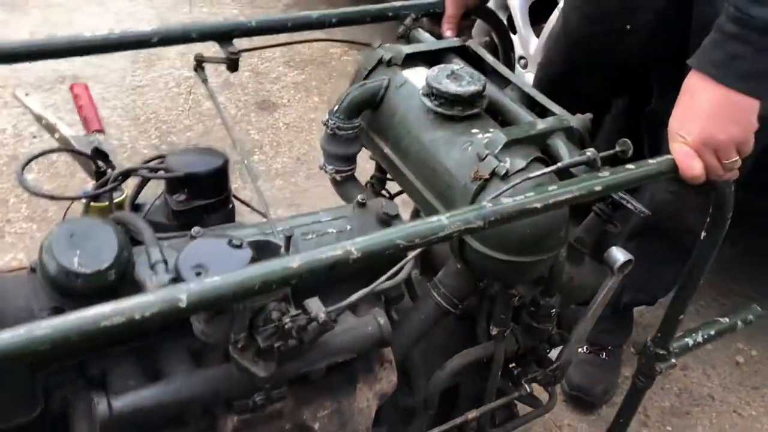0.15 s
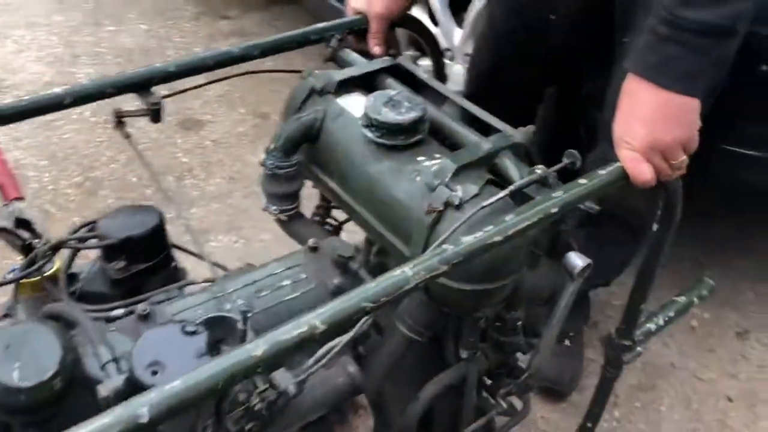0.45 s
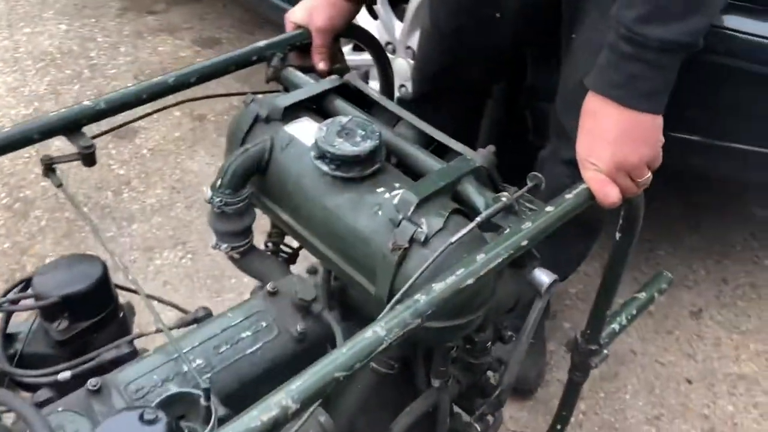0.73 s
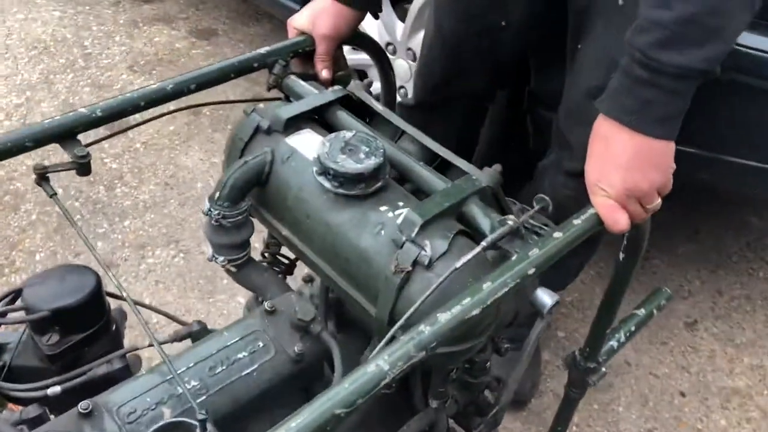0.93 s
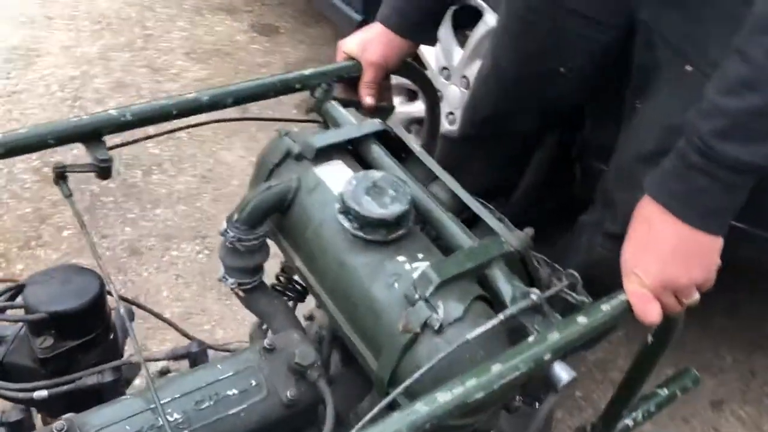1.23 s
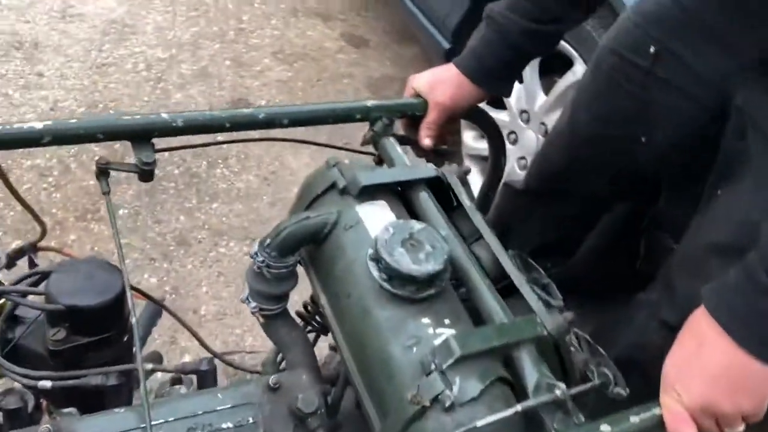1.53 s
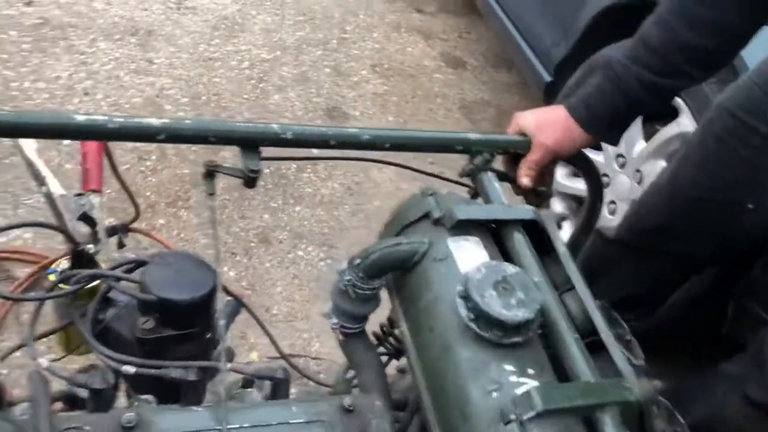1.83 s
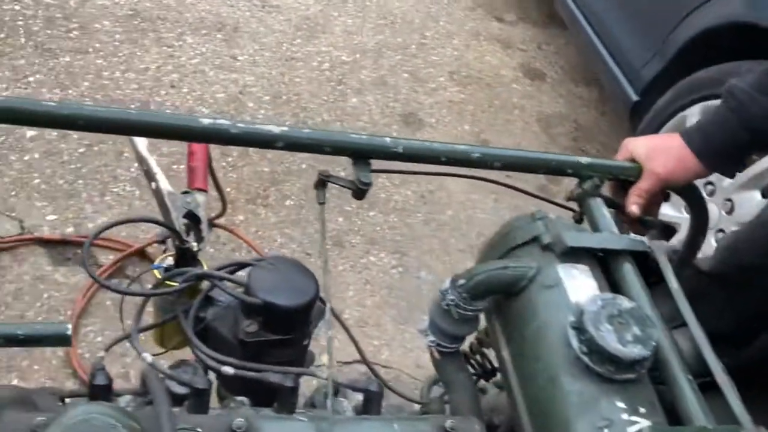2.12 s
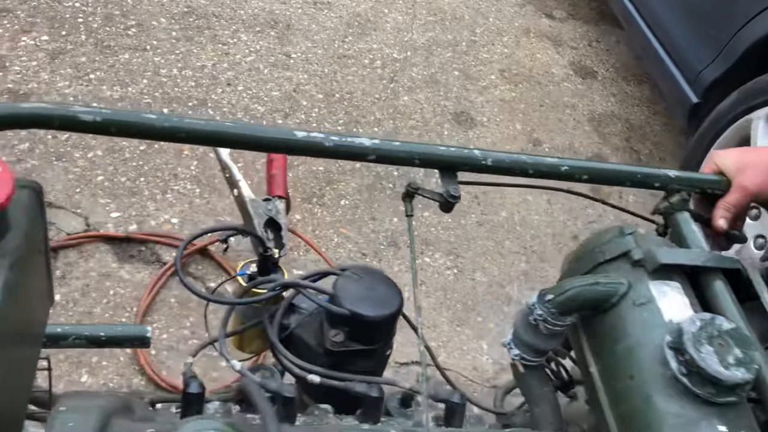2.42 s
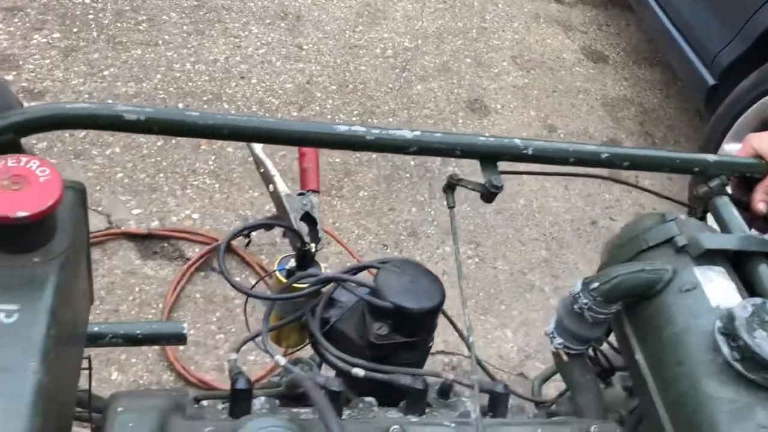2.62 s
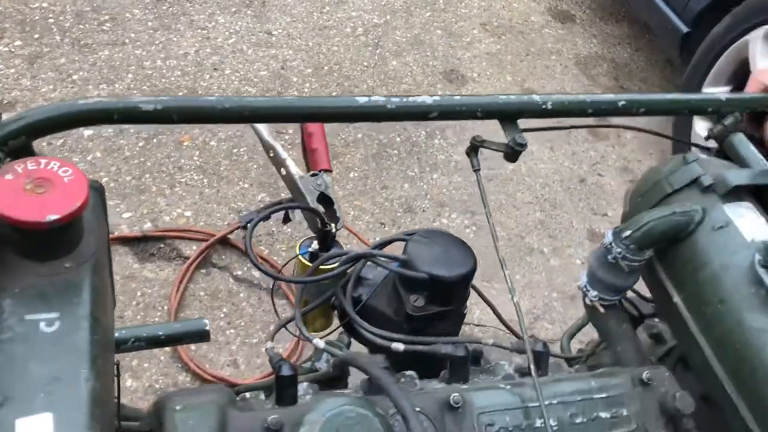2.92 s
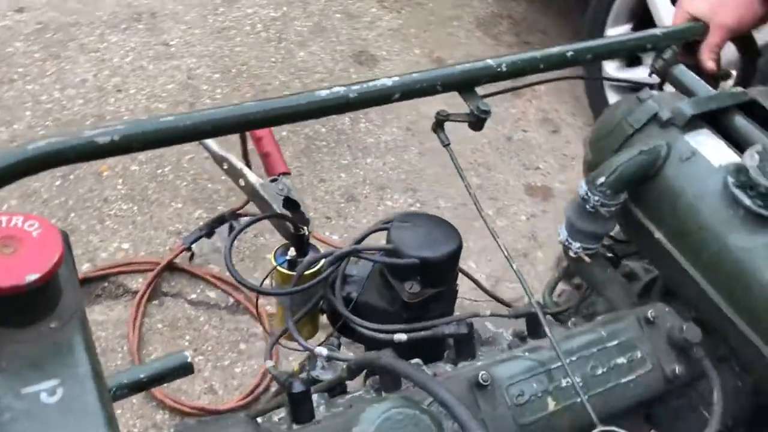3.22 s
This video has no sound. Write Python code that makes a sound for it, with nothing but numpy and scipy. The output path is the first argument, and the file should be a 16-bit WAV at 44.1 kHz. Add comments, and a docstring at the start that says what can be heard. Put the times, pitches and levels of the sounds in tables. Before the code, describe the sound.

Petrol engine drones steadily up close with deep exhaust rumble, rattling metal and airy hiss

```python
"""On a driveway, close to a moving microphone, a four-cylinder petrol engine runs at a fast idle.
Each firing is an impulse: it rings low exhaust resonances, buzzes the frame and sets off noise bursts
that ring as block clatter, valve gear and loose fittings. Filtered noise makes a steady hiss of air.
The speed wanders a little; near the end the engine pops and clanks briefly."""
import sys
import numpy as np
from scipy import signal
from scipy.io import wavfile
from scipy.ndimage import uniform_filter1d

SR = 44100
rng = np.random.default_rng(int(sys.argv[2]) if len(sys.argv) > 2 else 0)


def store_wav(level_fs):
    """Save 16-bit WAV to argv[1]."""
    pcm = np.round(np.clip(np.atleast_2d(level_fs), -1, 1) * 32767)
    wavfile.write(sys.argv[1], SR, pcm.T.astype(np.int16))


N = 148176
TIME = np.arange(N) / SR
BURST_SAMPLES = SR // 25

# Air rush spectrum: f/Hz, relative level/dB
AIR_SPECTRUM = [(20, -8), (60, 8), (250, 11), (450, 1.5), (1300, 1.5), (2100, -1), (2800, -5.5),
                (3400, -9.5), (4500, -9), (5200, -9.5), (7700, -19), (8800, -2), (9300, -6), (10000, -4.5),
                (12500, -13), (15800, -3.5)]
AIR_RUSH_DB = -27.5
# Levels as the microphone moves: t/s, then level/dB of
# manifold, frame, clatter, rasp, metal ringing, intake hiss, top hiss
MIC_LEVELS = [(0, -41, -32, -35, -41, -35.5, -36, -52), (.6, -41, -38, -31.5, -42, -35.5, -37.5, -41),
              (1.3, -35.5, -46, -31, -50, -35, -35.5, -39), (1.9, -29, -74, -32, -51, -36, -34, -33.5),
              (2.7, -28, -46, -35, -39, -36.5, -37, -34), (3.36, -31, -36.5, -31, -37, -38, -40, -43)]
MANIFOLD, FRAME, BLOCK, RASP, RINGING, INTAKE, TOP = range(1, 8)

# Loose fittings: t/s, level/dB
LOOSE_LEVELS = [(0, -30.5), (1.5, -42), (3.36, -36.5)]
LOOSE_HZ, LOOSE_SPREAD_HZ = 4110, 1530
LOOSE_SCATTER_DB, LOOSE_JITTER_S = 6, .002
# Harder knocks in the block: t/s, f/Hz, level/dB
BLOCK_KNOCKS = [(.547, 990, -23.5), (2.841, 1100, -22.5), (2.963, 960, -27.5), (3.101, 1240, -26)]
# Clanks of the valve gear: t/s, f/Hz, level/dB
VALVE_CLANKS = [(.512, 5200, -27), (2.67, 5000, -23), (2.72, 3920, -23), (2.806, 3900, -26),
                (3.225, 5110, -26)]

# Tappet ring near 3.95 kHz: t/s, level/dB
TAPPET_LEVELS = [(0, -39.5), (1.6, -43.5), (2, -39), (3.36, -38.5)]
# Valve tick spectrum: f/Hz, relative level/dB
TICK_SPECTRUM = [(800, -5), (2400, 0.5), (3400, -2.5), (4500, -11.5), (5500, -15), (7000, 1.5),
                 (7800, -2.5), (9800, 2), (12500, 1), (15500, -4)]
TICK_DB = -35
# Ringing of block and rocker cover: f/Hz, width/Hz, relative level/dB
METAL_MODES = [(830.4, 38, 1), (2956, 52, -8), (4883, 47, -4), (5210, 140, 2.5), (8480, 170, -7.5)]
# Block clatter spectrum: f/Hz, relative level/dB
CLATTER_SPECTRUM = [(150, -30.5), (400, -1), (650, 1.5), (850, -2), (1300, 2.5), (1700, -6.5), (2100, -12),
                    (3400, -20.5), (6000, -47), (15500, -12.5)]

# Engine speed: t/s, firing rate/Hz
FIRING_RATE = [(0.0, 55.79), (0.197, 60.12), (0.494, 57.3), (0.676, 57.03), (0.964, 59.47), (1.132, 58.75),
               (1.248, 61.95), (1.419, 59.54), (1.878, 61.81), (2.037, 58.61), (2.296, 56.44),
               (2.507, 60.76), (2.602, 59.61), (2.717, 59.4), (2.814, 58.7), (2.982, 56.85), (3.053, 57.55),
               (3.36, 56.4)]
START_BEAT = .15
# Cylinders in firing order: lateness/beats, then relative level/dB in exhaust, manifold, clatter
CYLINDER_ROWS = [(0.0047, 3, -3, 8.5), (-0.0044, 3.9, -2, 8), (0.0058, 2.1, -9, 7), (-0.0035, 5, 0, 6.5)]
LATENESS, EXHAUST_HIT, MANIFOLD_HIT, CLATTER_HIT = range(4)
# Exhaust resonances, deepest first: f/Hz, width/Hz, travel time/s
PIPE_MODES = [(56, 20, 0.0065), (110, 37.2, 0.0027), (164.4, 50, 0.0048), (197, 28, 0.00067),
              (277.4, 61, 0.00029), (327.8, 45, 0.0012)]
# Their levels at the microphone: t/s, then level/dB of each resonance in turn
PIPE_LEVELS = [(.3, -20.5, -18.5, -18.5, -33.5, -34, -40.5), (.9, -22, -19, -23, -41, -30, -34.5),
               (1.5, -21.5, -21, -26.5, -34, -26.5, -32.5), (2.4, -22, -21, -29, -42, -27, -34),
               (3, -20.5, -21.5, -25, -48, -23, -37)]
BURBLE_ABOVE_HZ = 185
# Weak firings: t/s, gain/dB
WEAK_FIRINGS = [(1.54, -7), (1.865, -2), (2.065, -13), (2.72, -9)]
WEAK_S = .009
# Exhaust pops: t/s, peak level/dB
EXHAUST_POPS = [(2.631, -8), (2.736, -11), (2.767, -9)]
POP_S = .0018

EDGE_HZ = 15800


def amp(db):
    """Decibels to gain."""
    return 10 ** (np.asarray(db) / 20)


def unit(x):
    """Scales to rms 1."""
    return x / np.sqrt(np.mean(x ** 2) + 1e-20)


def curve(table, column):
    """One column of a time table, at every sample."""
    table = np.array(table)
    return np.interp(TIME, table[:, 0], table[:, column])


def colour(x, spectrum):
    """Minimum-phase filter with the given spectrum; rms 1."""
    hz, db = np.transpose(spectrum)
    bin_hz = abs(np.fft.fftfreq(16384, 1 / SR))
    gain_db = np.interp(np.log(bin_hz + 1), np.log(hz), db)
    log_gain = np.log(amp(gain_db))
    taps = np.fft.ifft(np.exp(np.conj(signal.hilbert(log_gain)))).real
    return unit(signal.fftconvolve(x, taps[:len(taps) // 2])[:N])


def band(x, hz, width_hz, order=2):
    """A resonance around hz; rms 1."""
    edges_hz = np.clip([hz - width_hz / 2, hz + width_hz / 2], 10, SR / 2 - 10)
    sos = signal.butter(order, edges_hz, "band", fs=SR, output="sos")
    return unit(signal.sosfilt(sos, x))


def beat_times():
    """When each firing is due, and its cylinder's row: one firing per whole beat of the integrated rate."""
    beats = START_BEAT + np.cumsum(curve(FIRING_RATE, 1)) / SR
    count = np.arange(1, int(beats[-1]) + 1)
    cylinder = np.array(CYLINDER_ROWS)[count % len(CYLINDER_ROWS)]
    return np.interp(count + cylinder[:, LATENESS], beats, TIME), cylinder


def firings(column, scatter_db, jitter_s):
    """One impulse per firing, weighted by its cylinder and by chance."""
    times_s, cylinder = beat_times()
    late, strong = rng.standard_normal((len(times_s), 2)).T
    sizes = amp(cylinder[:, column] + scatter_db * np.clip(strong, -2, 2))
    samples = np.maximum((times_s + jitter_s * late) * SR, 0).astype(int)
    return np.bincount(samples, sizes, N)[:N]


def rattle(hits, rise_s, decay_s, grain_db):
    """Each hit sets off a burst of tiny impacts of uneven size; overlapping bursts add in power."""
    t = TIME[:BURST_SAMPLES]
    burst_power = (1 - np.exp(-t / rise_s)) ** 2 * np.exp(-2 * t / decay_s)
    power = signal.oaconvolve(hits ** 2, burst_power)[:N]
    grain_gain = amp(grain_db * rng.standard_normal(N // 20 + 1))
    grains = np.repeat(grain_gain, 20)[:N]
    return np.sqrt(abs(power)) * grains * rng.standard_normal(N)


def strikes(rows, width_hz, rise_s, decay_s):
    """Metal hits metal: each row (t/s, f/Hz, level/dB) is a short noise burst around its own pitch."""
    t, out = TIME[:BURST_SAMPLES], np.zeros(N)
    shape = (1 - np.exp(-t / rise_s)) ** 2 * np.exp(-t / decay_s)
    shape_rms = np.sqrt(np.mean(shape ** 2))
    for start_s, hz, db in rows:
        noise = band(rng.standard_normal(len(t)), hz, width_hz)
        burst = unit(noise * shape) * shape_rms / shape.max()
        part = out[max(int(start_s * SR), 0):][:len(t)]
        part += (amp(db) * burst)[:len(part)]  # a view: adds into out
    return out


def reflections(x, echo_db, drift_s):
    """Faint short echoes off the ground and tank, whose paths drift as the microphone moves."""
    out = x.copy()
    for start, phase, rate in rng.random((6, 3)):
        drift = np.sin(2 * np.pi * (phase + (.15 + .2 * rate) * TIME))
        delay_s = .001 + .008 * start + drift_s * drift
        out += amp(echo_db) * np.interp(TIME - delay_s, TIME, x)
    return out * np.std(x) / np.std(out)  # overall level kept


def air():
    """Fan and intake rush as coloured noise, plus two hiss bands that depend on the microphone's place."""
    rush, intake, fizz, flutter = rng.standard_normal((4, N))
    rush = amp(AIR_RUSH_DB) * colour(rush, AIR_SPECTRUM)
    intake_hiss = band(intake, hz=6250, width_hz=1800) * amp(curve(MIC_LEVELS, INTAKE))
    top_hiss = band(fizz, hz=14800, width_hz=2700) * amp(curve(MIC_LEVELS, TOP))
    flutter_db = unit(uniform_filter1d(flutter, size=150))  # 1 dB rms
    return (rush + intake_hiss + top_hiss) * amp(flutter_db)


def loose_parts():
    """Each firing jolts loose fittings at a random pitch and strength."""
    times_s = beat_times()[0]
    place, late, strong = rng.uniform(-1.009, 1, (len(times_s), 3)).T
    pitches_hz = LOOSE_HZ + LOOSE_SPREAD_HZ * place
    rows = zip(times_s + LOOSE_JITTER_S * late, pitches_hz, LOOSE_SCATTER_DB * strong)
    return strikes(rows, width_hz=670, rise_s=.0014, decay_s=.006) * amp(curve(LOOSE_LEVELS, 1))


def knocks():
    """Harder blows in the block: broad bursts, low in pitch."""
    return strikes(BLOCK_KNOCKS, width_hz=800, rise_s=.001, decay_s=.006)


def clanks():
    """Valve-gear blows: narrower bursts, high in pitch."""
    return strikes(VALVE_CLANKS, width_hz=380, rise_s=.0015, decay_s=.007)


def tappets():
    """One bright ring of the valve gear, struck harder on some firings than on others."""
    hits = firings(CLATTER_HIT, scatter_db=2.4, jitter_s=.0006)
    taps = rattle(hits, rise_s=.001, decay_s=.0045, grain_db=1.2)
    return band(taps, hz=3950, width_hz=110, order=1) * amp(curve(TAPPET_LEVELS, 1))


def valve_ticks():
    """The valve gear ticks on every firing: short coloured bursts."""
    hits = firings(CLATTER_HIT, scatter_db=1.2, jitter_s=.0005)
    ticks = rattle(hits, rise_s=.0014, decay_s=.006, grain_db=2)
    return amp(TICK_DB) * colour(ticks, TICK_SPECTRUM)


def valve_rasp():
    """The valve gear rasps on every firing: longer bursts in one band."""
    hits = firings(CLATTER_HIT, scatter_db=1.5, jitter_s=.0017)
    rasp = rattle(hits, rise_s=.00047, decay_s=.02, grain_db=0)
    return band(rasp, hz=2634, width_hz=530) * amp(curve(MIC_LEVELS, RASP))


def metal_ringing():
    """Every firing rings each mode of block and rocker cover by a different amount."""
    ring = np.zeros(N)
    for hz, width_hz, db in METAL_MODES:
        hits = firings(CLATTER_HIT, scatter_db=1.4, jitter_s=.0006)
        taps = rattle(hits, rise_s=.0018, decay_s=.005, grain_db=1.2)
        ring += amp(db) * band(taps, hz, width_hz, order=1)
    return unit(ring) * amp(curve(MIC_LEVELS, RINGING))


def clatter():
    """Pistons rattle the block on every firing."""
    hits = firings(CLATTER_HIT, scatter_db=2.5, jitter_s=.00087)
    bursts = rattle(hits, rise_s=.0028, decay_s=.005, grain_db=1)
    return colour(bursts, CLATTER_SPECTRUM) * amp(curve(MIC_LEVELS, BLOCK))


def frame():
    """Every firing shakes the frame in nearly the same way: two resonances buzz above the exhaust."""
    shakes = firings(EXHAUST_HIT, scatter_db=2.5, jitter_s=.0001)
    upper = band(shakes, hz=513, width_hz=82) * amp(curve(MIC_LEVELS, FRAME))
    lower = band(shakes, hz=453.5, width_hz=56) * amp(-40.5)
    return upper + lower


def pops():
    """Short pops in the exhaust: a pressure peak between two dips."""
    out = np.zeros(N)
    for peak_s, db in EXHAUST_POPS:
        x2 = ((TIME - peak_s) / POP_S) ** 2
        out += amp(db) * (1 - 2 * x2) * np.exp(-x2)
    return out


def exhaust():
    """Firing pulses ring low resonances; one weak cylinder makes the upper ones burble once a cycle."""
    even = firings(EXHAUST_HIT, scatter_db=.6, jitter_s=.0001)
    uneven = firings(MANIFOLD_HIT, scatter_db=1.1, jitter_s=.00008)
    out = band(uneven, hz=234.4, width_hz=53) * amp(curve(MIC_LEVELS, MANIFOLD))
    # already running: one cycle of lead-in
    lead = int(len(CYLINDER_ROWS) * SR / FIRING_RATE[0][1])
    for k, (hz, width_hz, travel_s) in enumerate(PIPE_MODES):
        pulses = uneven if hz > BURBLE_ABOVE_HZ else even
        ring = band(np.r_[pulses[:lead], pulses], hz, width_hz)
        ring_time_s = (np.arange(len(ring)) - lead) / SR
        out += np.interp(TIME - travel_s, ring_time_s, ring) * amp(curve(PIPE_LEVELS, k + 1))
    weak_db = sum(db * np.exp(-((TIME - dip_s) / WEAK_S) ** 2) for dip_s, db in WEAK_FIRINGS)
    return out * amp(weak_db)


def scene():
    """The whole engine in one channel; metal and air also arrive as echoes."""
    valves = tappets() + valve_ticks() + valve_rasp() + metal_ringing()
    metal_and_air = air() + loose_parts() + knocks() + clanks() + valves + clatter()
    echoed = reflections(metal_and_air, echo_db=-19.5, drift_s=.00018)
    return (echoed + frame() + pops() + exhaust())[None]


def record(dry):
    """The recorder's band limit: a linear-phase low-pass."""
    taps = signal.firwin(511, EDGE_HZ, window=("kaiser", 9), fs=SR)
    return signal.oaconvolve(dry, taps[None], "same")


dry = scene()
out = record(dry)
store_wav(out)
```